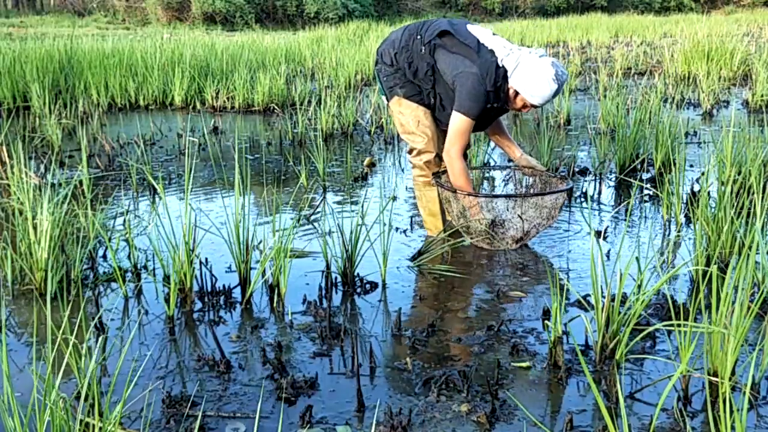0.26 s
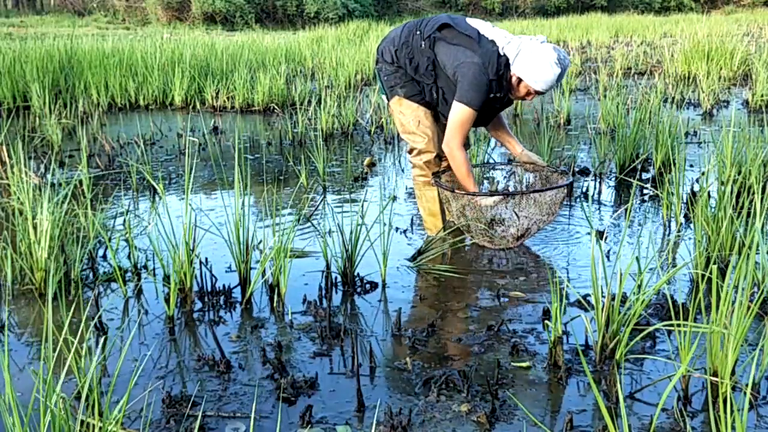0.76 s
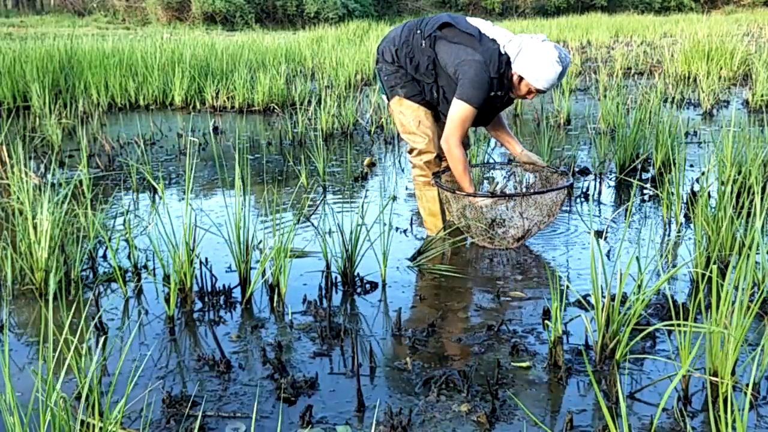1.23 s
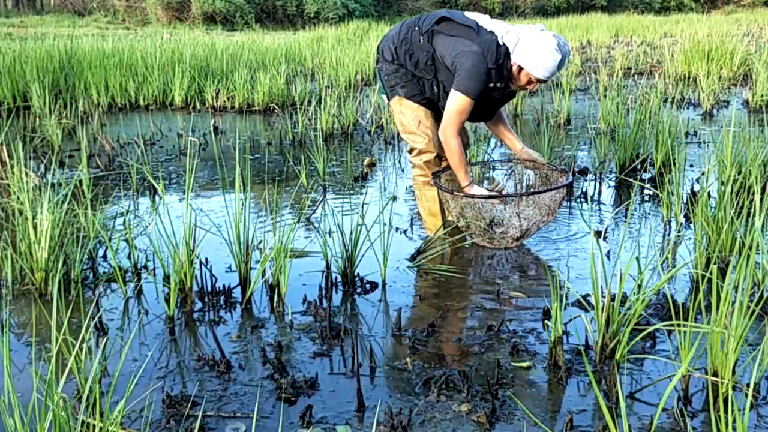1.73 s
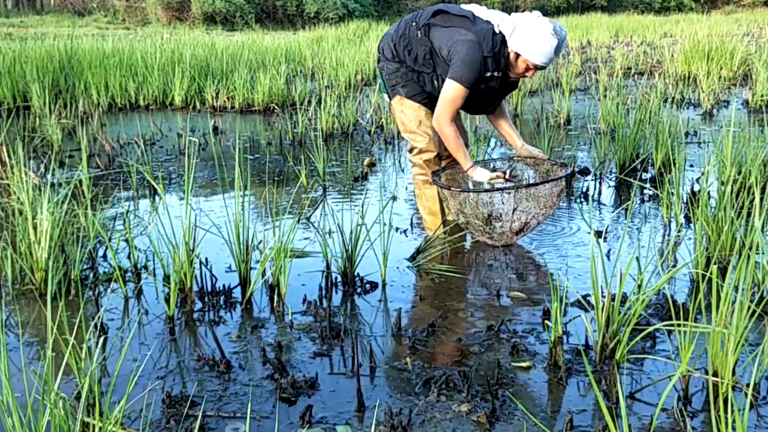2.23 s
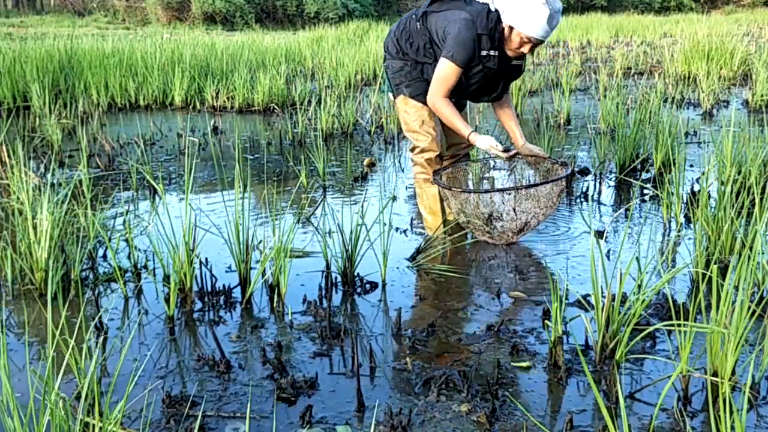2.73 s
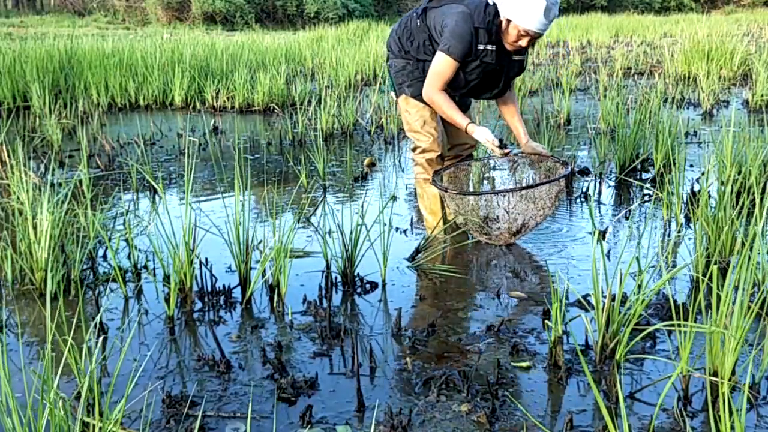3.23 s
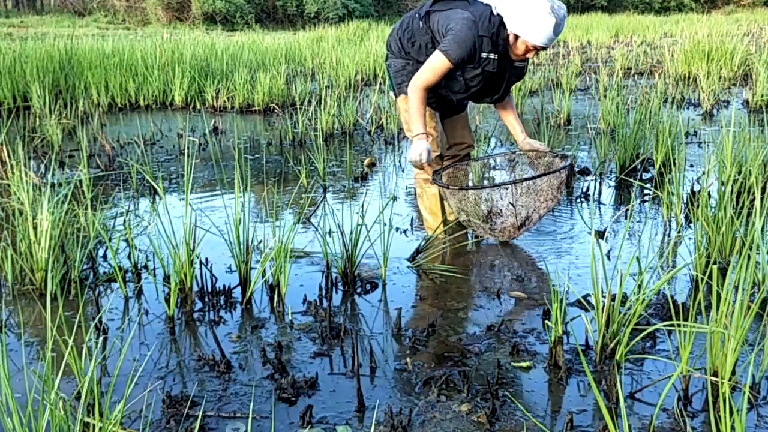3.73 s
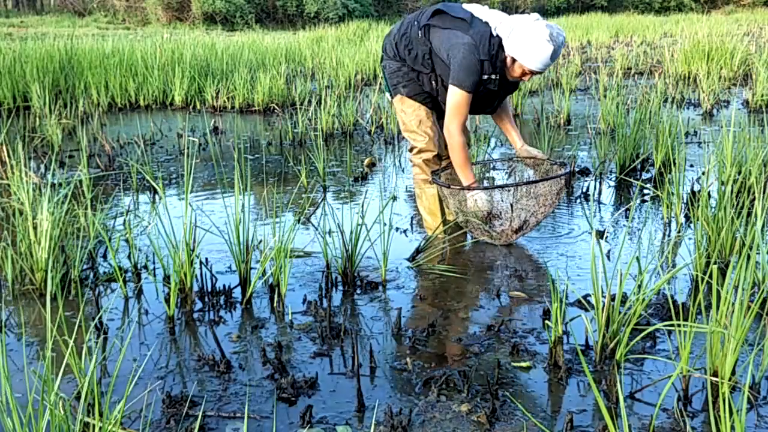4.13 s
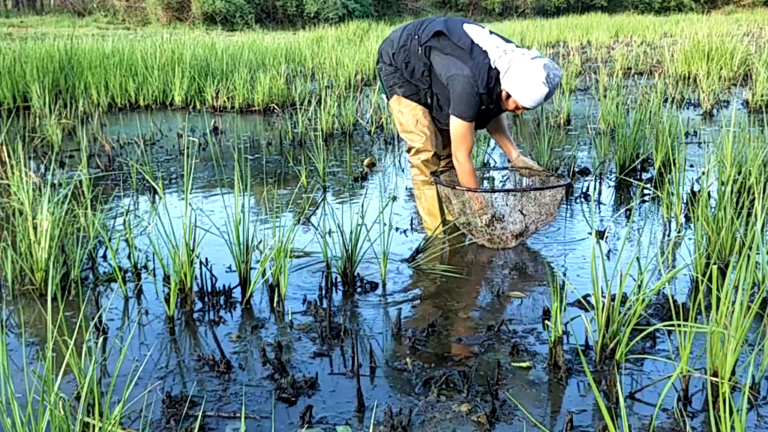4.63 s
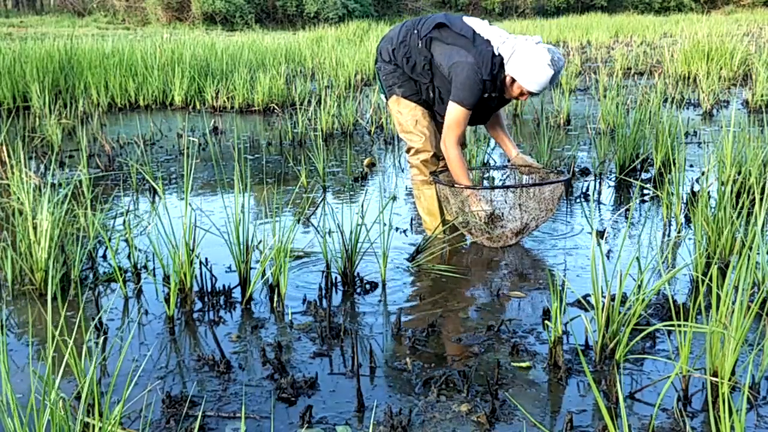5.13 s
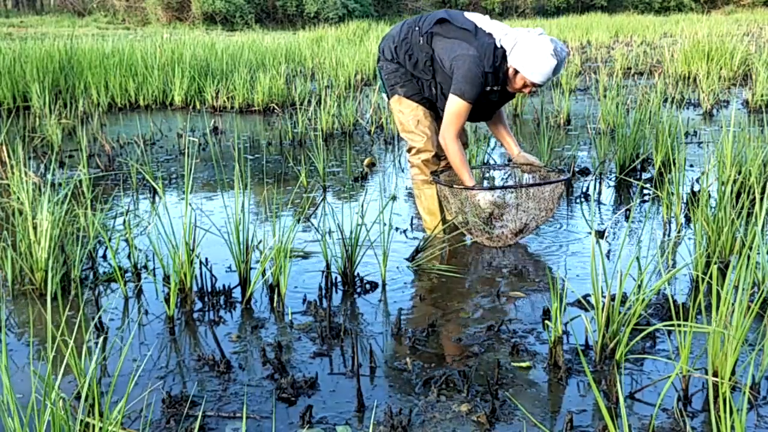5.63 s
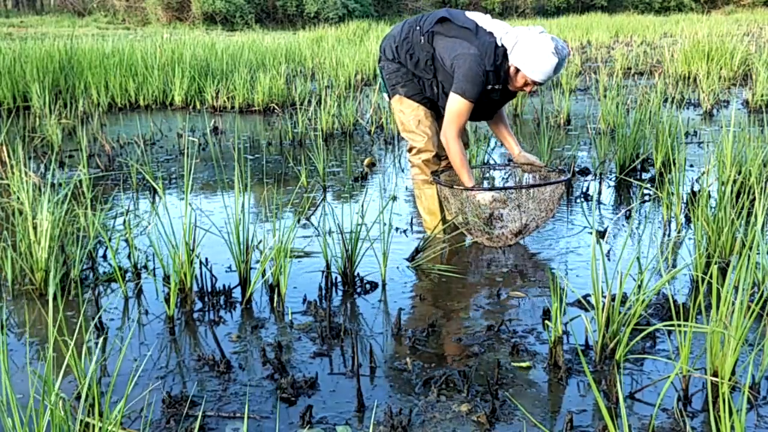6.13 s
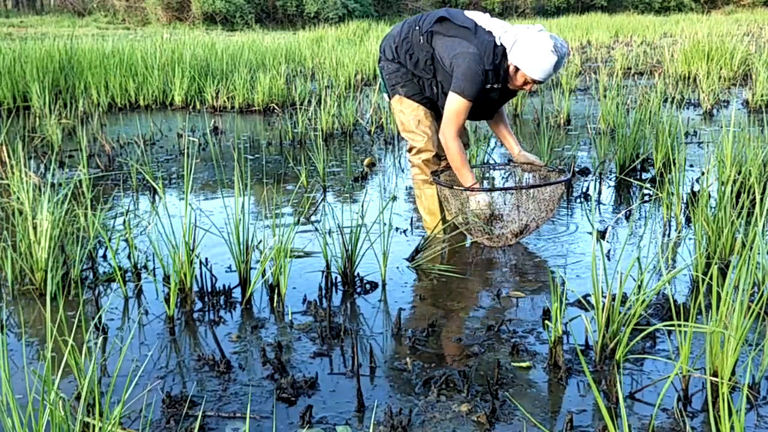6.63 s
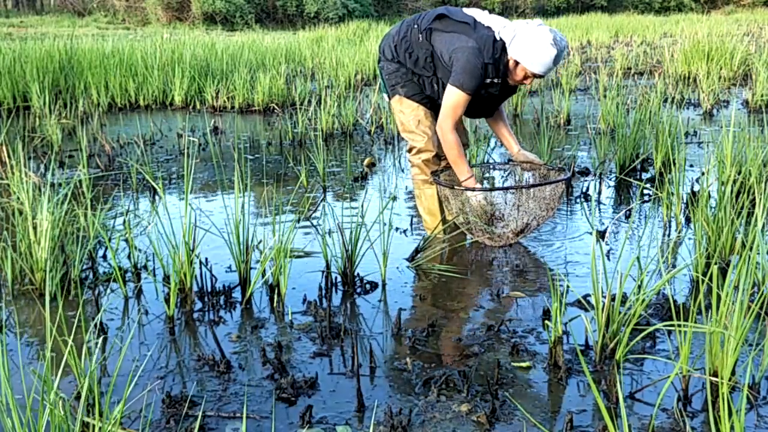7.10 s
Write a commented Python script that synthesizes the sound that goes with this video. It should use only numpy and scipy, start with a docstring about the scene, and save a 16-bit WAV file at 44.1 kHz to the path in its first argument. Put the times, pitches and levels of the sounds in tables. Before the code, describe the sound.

A calm reedy marsh in open air, captured in stereo from the bank, with low far rumble, thin air noise and a faint chorus of frogs and insects. From 0 to 4 seconds, uneven wind gusts buffet the microphone with dull thumps, strongest around 2.9 to 3.6, then the breeze dies away. A near songbird twitters rapidly at 0, 0.6, 1.2, 2.0 and 4.7; dry chips, burred whistles and far high buzzes surround it. Soft coos come early, with wavering rattles near 0.9 and 6.2. A thin insect buzz pulses from 1.7 to 3. Wet weed crackles on a net around 1.9 to 2.1. Small bubbly drops plink throughout; a brighter plop with fine spray lands at 3.8, a smaller one at 4.05. Sparse drips follow. From 6.4 a near bird repeats a tick-and-tweet phrase four times.

```python
"""A quiet reedy marsh: drops slap a shallow pond and ring as trapped bubbles, and wet weed crackles on a net.
Near birds twitter, chip and repeat a phrase; whistles, buzzes, coos and rattles come from further off, all as
gliding tones. An insect's ringing wing strokes pulse over chorus bands, air noise and a low rumble of filtered
noise. A breeze of low turbulence, gusts and eddies buffets two microphone ports, easing after four seconds."""
import sys
import numpy as np
from scipy import signal
from scipy.fft import rfft, irfft
from scipy.io import wavfile
from scipy.ndimage import uniform_filter1d

SR = 44100
rng = np.random.default_rng(int(sys.argv[2]) if len(sys.argv) > 2 else 0)


def master(y):
    """Save y as 16-bit WAV."""
    cut = np.clip(np.atleast_2d(y).T, -1, 1)
    pcm = np.round(cut * 32767)  # scale
    wavfile.write(sys.argv[1], SR, pcm.astype(np.int16))


N = 324576  # length in samples

# far, steady rumble, relative spectrum: freq_hz, density_db_per_hz
RUMBLE_SPECTRUM = [(20, -17), (35, -10), (55, 3), (105, 2.5), (165, -4), (220, -13.5), (300, -20),
                   (420, -34), (700, -63)]
RUMBLE_DB = -54
# open air and reeds, noise spectrum: freq_hz, density_db_per_hz
AIR_SPECTRUM = [(40, -81), (200, -94), (350, -95), (500, -98.5), (1000, -102), (1500, -102), (4200, -104),
                (4900, -118), (6000, -117), (6700, -126), (9000, -127), (12500, -127)]
# distant chorus of frogs and insects, one band a row: centre_hz, width_hz, level_db
CHORUS_BANDS = [(1831, 115, -74), (2415, 362, -66), (3050, 410, -76.5), (3970, 363, -66.5),
                (8820, 400, -101.5)]
# turbulence at the ports, relative spectrum: freq_hz, density_db_per_hz
WIND_SPECTRUM = [(15, -21.5), (30, -8), (55, 0.5), (75, 3), (105, 1.5), (160, -6.5), (210, -17),
                 (280, -29.5), (400, -36.5), (700, -62.5)]
# strength of the breeze between gusts: time_s, level_db
BREEZE_LEVEL = [(0, -45.5), (1.45, -47.5), (2.4, -45.5), (3.7, -50.5), (4.2, -57), (5.1, -58), (5.9, -59),
                (6.4, -66), (7.36, -77)]
# gusts, each on one port: peak_s, length_s, level_db (before a small trim), port (0 left, 1 right)
GUST_SWELLS = [(0.23, 0.12, -33.5, 1), (0.44, 0.12, -45, 0), (0.62, 0.14, -34, 1), (0.794, 0.1, -32.5, 1),
               (0.988, 0.18, -44, 0), (1.164, 0.091, -31.5, 1), (1.8, 0.15, -44.5, 0),
               (1.925, 0.22, -34.5, 1), (2.28, 0.094, -35.5, 1), (2.29, 0.2, -41, 0),
               (2.523, 0.12, -32.5, 1), (2.668, 0.053, -36, 0), (2.682, 0.068, -33.5, 1),
               (2.868, 0.2, -37.5, 1), (2.979, 0.086, -36.5, 0), (3.157, 0.023, -35.5, 1),
               (3.295, 0.067, -33.5, 0), (3.38, 0.11, -33, 1), (3.626, 0.07, -39.5, 0),
               (3.717, 0.066, -42, 1), (3.876, 0.097, -42, 1), (4.87, 0.2, -49, 0), (5.247, 0.099, -46, 0),
               (5.908, 0.27, -49, 0)]
# single eddies that strike one port: peak_s, pitch_hz, level_db, port (0 left, 1 right)
EDDY_THUMPS = [(.457, 92, -23.5, 0), (2.912, 79, -18, 1), (3.189, 96, -21.5, 0), (3.303, 101, -22.5, 0),
               (3.402, 100, -25.5, 1), (3.422, 125, -28.5, 1), (3.537, 85, -24.5, 0),
               (3.610, 106, -20.5, 0), (3.623, 114, -14, 0), (3.721, 123, -28, 1), (3.848, 73, -24.5, 1),
               (4.815, 73, -27, 0), (4.929, 79, -30, 0)]
# a small insect's buzz: time_s, level_db, pulse_depth (0-1)
INSECT_BUZZ = [(0, -91, .2), (1.0, -89, 0.53), (1.7, -80, 0.95), (2.2, -78.5, 0.8), (2.85, -76.5, 1),
               (2.95, -80, 1), (3.05, -104, .2), (5.5, -100, .2), (7.3, -99.5, 0.5)]
# a dove's coos and a marsh bird's hoots: start_s, length_s, start_hz, end_hz, level_db
COO_NOTES = [(0, 0.093, 305, 335, -58.5), (.27, 0.25, 328, 322, -64.5), (.62, 0.42, 327.3, 333.7, -64),
             (1.0, 0.17, 306.3, 327, -60), (1.38, 0.18, 300, 336, -61), (.68, 0.084, 775, 756, -66),
             (6.05, .093, 738, 720, -70), (7.28, 0.098, 835, 840, -67)]
# the marsh bird's falling rattle after a hoot: start_s, length_s, start_hz, end_hz, level_db
RATTLE_NOTES = [(.86, .56, 762, 618, -65), (6.24, .52, 778, 625, -67.5)]
# a far bird's very high buzzes, in threes: start_s, spacing_s
BUZZ_STARTS = [(1.77, .3), (5.17, .345)]
BUZZ_S, BUZZ_HZ, BUZZ_DB = 0.17, 7420, -84  # one buzz
# whistles across the pond: start_s, length_s, start_hz, end_hz, level_db (before the far trim), burr (0-1)
WHISTLE_NOTES = [(.31, .04, 5650, 5100, -74, 0.9), (.342, 0.077, 4800, 3920, -63.5, 0.98),
                 (3.392, 0.048, 5240, 4840, -72, .8), (3.42, 0.053, 4600, 4550, -66, 0.13),
                 (6.39, 0.056, 5670, 4860, -75, 0.9), (6.44, 0.05, 4740, 4620, -69, 0.4),
                 (.825, 0.12, 3140, 2990, -60.5, 0.2), (.912, 0.078, 2970, 2735, -57, 0.1),
                 (1.51, 0.1, 1940, 1920, -60, 0.09), (1.675, 0.06, 3320, 3160, -58.5, 0.5),
                 (1.725, 0.09, 2940, 2670, -61, 0.46), (1.945, 0.072, 3270, 3030, -57.5, 0.7),
                 (2.193, 0.022, 5250, 5300, -64, 0.7), (2.212, 0.059, 5500, 5510, -61, 0.3),
                 (2.405, 0.051, 2730, 2840, -62, 0.4), (2.447, 0.082, 2836, 2910, -55.5, 0.34),
                 (2.93, 0.093, 3120, 3040, -66, 0.04), (3.01, 0.13, 3140, 2983, -60, 0.6),
                 (3.275, 0.11, 3250, 3200, -66, 0.5), (3.02, 0.24, 1937, 1947, -59.5, 0.6),
                 (3.85, 0.124, 2060, 1853, -60, .2), (4.03, 0.12, 2530, 2560, -61, 0.27),
                 (4.29, 0.1, 2920, 2740, -61, 0.02), (4.622, 0.045, 3020, 2820, -60, 0.35),
                 (4.66, 0.079, 2820, 2880, -56, 0.3), (4.757, 0.07, 2570, 2503, -59.5, 0.16),
                 (5.535, 0.15, 3070, 3140, -60.5, 0.48), (5.665, 0.053, 1930, 1900, -61, 0.05),
                 (5.718, 0.032, 1910, 1860, -56.5, .15), (5.745, 0.077, 3420, 3380, -61.5, 0.18),
                 (5.822, 0.091, 3046, 3025, -59, 0.26)]
# dry chips from the reeds, single or in quick series: start_s, chip_count, pitch_hz, level_db
CHIP_SERIES = [(.472, 1, 3720, -52.5), (.577, 1, 3700, -56), (1.901, 1, 3600, -51.5), (4.584, 1, 3630, -55),
               (5.035, 1, 3750, -52.5), (6.238, 3, 4010, -54), (6.528, 1, 4100, -57),
               (6.567, 3, 3960, -53.5), (7.159, 1, 4240, -56)]
CHIP_S, CHIP_SPACING_S = .008, .0205
CHIP_FALL, CHIP_FADE_DB = 0.28, 1  # fall as a share of the pitch; loss per chip in a series
# a near bird's repeated phrase: start_s, level_db, tweet_rise_hz
PHRASE_REPEATS = [(6.431, -51.5, 260), (6.697, -50, 240), (6.939, -51, 220), (7.190, -51, 20)]
# tick and flick that open the phrase: delay_s, length_s, start_hz, end_hz, relative_level_db, burr (0-1)
OPENING_NOTES = [(0, 0.013, 4326, 3960, 0.2, 0.33), (0.021, 0.0126, 3850, 2770, -3.5, 0.84)]
TWEET_DELAY_S, TWEET_S, TWEET_HZ, TWEET_DB = 0.049, 0.041, 3760, 0.7  # closing tweet; dB over the phrase
# a near songbird's runs of slurs: start_s, length_s, centre_hz, sweep_hz, level_db
TWITTER_SLURS = [(.006, 0.016, 3370, 748, -50.5), (0.036, 0.016, 3310, 800, -48.5),
                 (.066, 0.017, 3400, 900, -46.5), (0.095, 0.015, 3220, 448, -51.5),
                 (0.124, 0.026, 3385, 452, -45.5), (0.61, .014, 3280, 500, -51.5),
                 (0.642, .016, 3250, 398, -50.5), (0.674, 0.017, 3280, 698, -49.5),
                 (0.704, .016, 3340, 699, -49), (.734, 0.019, 3350, 649, -46.5),
                 (0.765, 0.023, 3285, 220, -48.5), (0.801, .014, 3290, 280, -49),
                 (0.829, 0.024, 3450, 347, -49), (1.238, 0.022, 3280, 604, -52),
                 (1.265, 0.028, 3215, 700, -51.5), (1.302, 0.017, 3260, 650, -51.5),
                 (1.33, 0.015, 3280, 500, -52.5), (1.361, 0.017, 3280, 600, -53),
                 (1.393, 0.018, 3220, 600, -54.5), (1.426, 0.019, 3460, 650, -49),
                 (1.445, 0.025, 3360, 546, -46.5), (1.468, 0.036, 3510, 243, -49),
                 (1.499, 0.016, 3390, -250, -48), (2.021, 0.017, 3230, 750, -51),
                 (2.057, 0.015, 3310, 850, -50.5), (2.088, 0.022, 3290, 498, -48.5),
                 (2.121, 0.019, 3340, 900, -50.5), (2.156, .016, 3620, 850, -47.5),
                 (2.193, 0.025, 3420, 550, -48), (2.235, 0.019, 3300, 99, -48.5),
                 (4.694, .013, 3350, 456, -55), (4.72, 0.012, 3280, 600, -52),
                 (4.751, 0.012, 3270, 500, -49), (4.778, 0.018, 3270, 450, -48),
                 (4.812, 0.014, 3250, 550, -47), (4.841, 0.018, 3240, 652, -47),
                 (4.874, 0.016, 3210, 750, -49), (4.906, 0.015, 3370, 500, -49),
                 (4.938, 0.011, 3360, 402, -54.5), (4.961, .017, 3420, 250, -48.5),
                 (4.974, 0.022, 3350, -320, -50.5)]
# wet weed dragged over the mesh in rubs and scratches: peak_s, length_s, centre_hz, level_db
WEED_RUBS = [(.05, .38, 5400, -86), (.7, 0.53, 5320, -81), (1.364, .012, 4800, -75),
             (1.406, 0.0089, 4500, -70), (1.869, .012, 4670, -68), (1.932, 0.0097, 4570, -60.5),
             (1.927, 0.017, 6100, -71), (2.005, .012, 4700, -66), (2.026, .012, 6500, -71),
             (2.04, 0.24, 5830, -78.5), (2.078, .012, 5450, -66), (2.452, 0.93, 5370, -85),
             (3.3, 0.2, 5360, -84), (3.827, 0.072, 5500, -75), (6.24, 0.29, 5370, -83)]
# drops that trap a bubble, levels before the water filter:
# start_s, pitch_hz, ring_level_db, decay_s, impact_over_ring_db
WATER_DROPS = [(.704, 1760, -52.5, 0.007, -4), (0.713, 2300, -50, .0024, 4), (.734, 1200, -46, 0.0014, 7),
               (1.340, 2030, -50, 0.0062, -5), (1.3602, 3850, -43, 0.0021, -12),
               (1.413, 2770, -45, 0.0018, 1), (1.651, 1690, -48, 0.0041, -6),
               (1.8629, 1865, -48.5, 0.0083, -1), (2.016, 1507, -47, 0.0089, 1),
               (2.976, 1092, -48.5, 0.012, -1), (3.479, 1780, -45, 0.0039, -10),
               (3.767, 2280, -45.5, 0.00079, 7), (3.7893, 1244, -37.5, 0.0055, 14.5),
               (3.798, 1190, -54, 0.01, -12), (3.797, 3850, -48, 0.0017, -6),
               (3.801, 2580, -40.5, 0.0025, -4), (3.809, 2900, -49, .0018, -6),
               (3.816, 3080, -51, .002, -8), (3.8205, 2150, -52, 0.0027, -8), (3.8265, 2750, -49, .003, -6),
               (3.8263, 1440, -39, 0.0018, -5), (3.836, 1240, -46, 0.0038, 3),
               (3.8445, 1960, -45, .002, -2), (3.857, 2080, -59, 0.0045, -8),
               (3.874, 1740, -50, 0.0046, -12), (3.889, 1960, -54, .005, -10),
               (3.964, 2470, -49.5, 0.0047, -8), (4.011, 1250, -55.5, .008, -8),
               (4.045, 1510, -37.5, 0.0021, 1), (4.0473, 2500, -49, 0.003, -8),
               (4.051, 1330, -48.5, 0.0065, -12), (4.062, 1260, -57, 0.0069, -10),
               (4.063, 2000, -53, .002, 0), (4.0815, 1186, -46.5, 0.0054, 6), (4.441, 840, -46, .0016, -5),
               (4.912, 1280, -52.5, 0.0063, 1), (5.594, 4000, -45.5, .0029, -9),
               (5.682, 1570, -53, 0.0074, -6), (5.711, 1457, -50.5, 0.013, -7),
               (5.855, 2380, -46, 0.0027, -1), (6.063, 1570, -50, 0.0054, 2),
               (6.549, 1755, -50.5, 0.0053, -4), (6.662, 2120, -49, 0.0043, -8),
               (7.067, 1080, -47.5, 0.0013, -8)]
# fine spray from bigger plops, level before the water filter: start_s, length_s, loudest_droplet_db
SPRAY_BURSTS = [(3.789, .014, -45), (3.805, 0.055, -43.5), (4.043, 0.046, -49)]
# bursting water films, level before colouring: start_s, level_db, decay_s
FILM_CRACKS = [(3.767, -62, .002), (3.772, -56, .002), (3.7954, -51, .0015), (3.799, -45, .002),
               (3.803, -45, .0018), (3.844, -56, 0.0065), (.734, -55, .001), (1.652, -64, .001)]
# brightness of those cracks: freq_hz, gain_db
CRACK_COLOUR = [(800, -18), (2500, -16), (4500, 4.0), (7500, -6.5), (10000, -18), (13000, -5)]
TOP_HZ = 12750  # edge of the recorder's top cut


def undb(db):
    """Decibels to gain."""
    return 10 ** (np.asarray(db) / 20)


def curve(rows, axis=1):
    """One column of a table, joined by straight lines in time."""
    rows = np.array(rows)
    return np.interp(np.arange(N) / SR, rows[:, 0], rows[:, axis])


def unit(x):
    """Scale to rms 1."""
    return x / np.sqrt(np.mean(x ** 2))


def walk(rate, size=N):
    """Slow chance with a spread near 1: random knots, rate per second, joined by lines."""
    knots = np.arange(size) / SR * rate
    count = int(knots[-1]) + 2
    return 1.2 * np.interp(knots, np.arange(count), rng.standard_normal(count))


def bins():
    """Frequencies of the spectrum of a whole track."""
    return np.fft.rfftfreq(N, 1 / SR)


def colour(points):
    """Gain at every frequency from (Hz, dB) points."""
    hz, db = np.transpose(points)
    return undb(np.interp(np.log(bins() + 1), np.log(hz), db))


def noise_pair(gain, likeness):
    """Coloured noise at two ports that have a share of it in common."""
    left, right, common = rng.standard_normal((3, N))
    share = np.clip(likeness, 0, 1)
    mixed = np.sqrt(1 - share) * np.array([left, right]) + np.sqrt(share) * common
    return irfft(rfft(mixed) * gain, N)


def band(x, low_hz, high_hz, order=2):
    """Band-pass filter."""
    edges = [low_hz, min(high_hz, SR / 2 - 1)]
    return signal.sosfilt(signal.butter(order, edges, "band", fs=SR, output="sos"), x)


def add(track, s, sound):
    """Mix a short sound into a track at time s."""
    i = int(np.clip(s * SR, 0, N - 1))
    track[i:i + len(sound)] += sound[:N - i]


def swell_at(s, length, db):
    """A bell-shaped rise and fall of gain, about length seconds wide."""
    return undb(db) * np.exp(-2 * ((np.arange(N) / SR - s) / length) ** 2)


def place(x, lead_ms, pan_db, wet_db, t60):
    """Direct sound reaches one port first (left if positive); reeds and bank scatter a thin tail."""
    sides = np.array([[.5], [-.5]])
    lead = np.exp(2j * np.pi * bins() * sides * lead_ms / 1000)
    direct = irfft(rfft(x) * lead, N) * undb(sides * pan_db)
    t = np.arange(SR) / SR
    tail = rng.standard_normal((2, SR)) * np.exp(-np.log(1000) * t / t60)
    tail /= np.sqrt(np.sum(tail ** 2, axis=1, keepdims=True))
    return direct + undb(wet_db) * signal.fftconvolve(x[None], tail, axes=1)[:, :N]


def song(notes, burr_hz=260, burr_rate=125, rasp=0.65, waver=0.0036, fullness=1):
    """Each note is a gliding tone that swells and fades; a burr is a fast, slightly uneven vibrato."""
    out = np.zeros(N)
    for s, length, start_hz, end_hz, db, *burr in notes:
        size = max(int(length * SR), 16)
        vibrato = np.sin(2 * np.pi * burr_rate * np.arange(size) / SR) + rasp * walk(500, size)
        glide = np.linspace(start_hz, end_hz, size) * (1 + waver * walk(90, size))
        hz = glide + sum(burr) * burr_hz * vibrato  # a note without a burr column stays clean
        swell = np.abs(np.sin(np.linspace(0, np.pi, size))) ** fullness
        add(out, s, undb(db) * swell * np.sin(2 * np.pi * np.cumsum(hz) / SR))
    return out


def rumble(swell_db=0.35):
    """Deep sound from far away reaches both ports nearly alike."""
    noise = unit(noise_pair(colour(RUMBLE_SPECTRUM), likeness=0.97))
    return noise * undb(RUMBLE_DB + swell_db * walk(2.0))


def marsh(flicker_db=1.13, swell_db=1.36):
    """Smooth air noise under the bands of a far chorus that swell and flicker."""
    out = noise_pair(colour(AIR_SPECTRUM) * np.sqrt(SR / 2), likeness=0.1)
    for hz, width_hz, db in CHORUS_BANDS:
        bell = np.exp(-((bins() - hz) / width_hz) ** 2 / 2)
        voices = unit(noise_pair(bell, likeness=0.027))
        out = out + voices * undb(db + swell_db * walk(1.676) + flicker_db * walk(30))
    return out


def breeze(gust_db=0.03, flutter_db=2.5, eddy_cycles=0.2):
    """Each port has mostly its own turbulence, swelling in gusts; now and then an eddy thumps one port."""
    power = np.array([undb(curve(BREEZE_LEVEL))] * 2) ** 2
    for s, length, db, port in GUST_SWELLS:
        power[int(round(port))] += swell_at(s, length, db + gust_db) ** 2
    flutter = flutter_db * np.array([walk(35), walk(35)])
    out = unit(noise_pair(colour(WIND_SPECTRUM), likeness=0.065)) * np.sqrt(power) * undb(flutter)
    t = np.arange(-SR // 20, SR // 20) / SR
    for s, hz, db, port in EDDY_THUMPS:
        thump = np.cos(2 * np.pi * hz * t) / np.cosh(t * hz / eddy_cycles)
        add(out[int(round(port))], s + t[0], undb(db) * thump)
    return signal.sosfilt(signal.butter(2, 620, fs=SR, output="sos"), out)  # low-pass, Hz


def insect(pulse_hz=8.2, first_s=0.135, swell=1.6, stroke_hz=125, ring_hz=8750, stroke_fall=0.061,
           waver=0.013, sharpness=1.4):
    """Each wing stroke rings one high, falling tone; strokes come in pulses that build up and stop short."""
    t = np.arange(N) / SR
    depth = np.clip(curve(INSECT_BUZZ, axis=2), 0, 1)
    ramps = (((t - first_s) * pulse_hz) % 1) ** swell
    pulses = 1 - depth + depth * uniform_filter1d(ramps, size=500)
    phase = np.cumsum(stroke_hz * (1 + .012 * walk(20))) / SR % 1
    hz = ring_hz * (1 + stroke_fall * (.5 - phase) + waver * walk(500))
    beat = np.sin(np.pi * phase) ** (2 * sharpness)
    strokes = unit(beat * np.sin(2 * np.pi * np.cumsum(hz) / SR))
    level = undb(curve(INSECT_BUZZ) + 1.2 * walk(60))
    return place(strokes * pulses * level, lead_ms=-0.031, pan_db=-1.5, wet_db=-5.5, t60=0.15)


def low_calls(rattle_hz=38):
    """Coos and hoots are low wavering tones; a fast throb in level chops the falling rattles."""
    throb = (.5 + .5 * np.cos(2 * np.pi * np.cumsum(rattle_hz + 2 * walk(12)) / SR)) ** 2
    coos = song(COO_NOTES, waver=.02, fullness=.7)
    rattles = throb * song(RATTLE_NOTES, waver=0.0404, fullness=0.21)
    return place(coos + rattles, lead_ms=.34, pan_db=-.8, wet_db=-8, t60=.6)


def buzzes():
    """Three level, fully burred notes at an even pace, behind a strong tail."""
    notes = [(s + k * spacing, BUZZ_S, BUZZ_HZ, BUZZ_HZ, BUZZ_DB, 1)
             for s, spacing in BUZZ_STARTS for k in range(3)]
    calls = song(notes, burr_hz=290, burr_rate=100, rasp=0.38, fullness=0.56)
    return place(calls, lead_ms=0.025, pan_db=-2.0, wet_db=1, t60=0.43)


def faint_notes(db=-70, centre_hz=2900, spread_octaves=0.45, glide=0.066, length_s=0.11, count=8):
    """Faint birds call at random times and pitches, each note falling slightly."""
    notes = []
    for when, pitch, burr in rng.random((count, 3)):
        hz = centre_hz * 2 ** (spread_octaves * (pitch - .5))
        notes.append((when * N / SR, length_s, hz, hz * (1 - glide), db, burr / 2))
    return notes


def whistles(far_db=-1.5, flutter_db=2.0):
    """Far whistles and faint calls hold full through each note; moving air makes them flutter in level."""
    calls = song(WHISTLE_NOTES + faint_notes(), burr_hz=193.0, fullness=0.26)
    far = calls * undb(far_db + flutter_db * walk(70))
    return place(far, lead_ms=.04, pan_db=1.5, wet_db=-7.5, t60=.7)


def chips():
    """Every chip is a quick fall in pitch; a series fades as it goes."""
    top, bottom = 1 + CHIP_FALL / 2, 1 - CHIP_FALL / 2
    notes = [(s + k * CHIP_SPACING_S, CHIP_S, hz * top, hz * bottom, db - k * CHIP_FADE_DB)
             for s, count, hz, db in CHIP_SERIES for k in range(int(round(count)))]
    return place(song(notes), lead_ms=0.063, pan_db=2.5, wet_db=-2.0, t60=0.3)


def phrases():
    """Tick and flick keep their pitches at every repeat; the closing tweet rises less each time."""
    notes = []
    for s, db, rise_hz in PHRASE_REPEATS:
        for delay, length, start_hz, end_hz, note_db, burr in OPENING_NOTES:
            notes.append((s + delay, length, start_hz, end_hz, db + note_db, burr))
        low_hz, high_hz = TWEET_HZ - rise_hz / 2, TWEET_HZ + rise_hz / 2
        notes.append((s + TWEET_DELAY_S, TWEET_S, low_hz, high_hz, db + TWEET_DB, .08))
    return place(song(notes), lead_ms=0.039, pan_db=-0.5, wet_db=-9.5, t60=0.27)


def twitter(burr=.08):
    """Every slur sweeps through its centre pitch with a slight burr."""
    notes = [(s, length, hz - sweep / 2, hz + sweep / 2, db, burr)
             for s, length, hz, sweep, db in TWITTER_SLURS]
    return place(song(notes, waver=0.0052), lead_ms=0.077, pan_db=1.5, wet_db=-9, t60=0.45)


def rustle(grains_per_s=1100, spread_db=4, width=0.16):
    """Tiny crackles of wet weed dragged over the mesh; each rub swells in a band of its own."""
    grains = (rng.random(N) < grains_per_s / SR) * rng.choice([-1, 1], N)
    crackle = grains * undb(spread_db * np.minimum(rng.exponential(size=N), 4))
    rubs = np.zeros(N)
    for s, length, hz, db in WEED_RUBS:
        scratch = unit(band(crackle, hz / (1 + width), hz * (1 + width), order=3))
        rubs += scratch * swell_at(s, length, db)
    return place(rubs, lead_ms=-0.055, pan_db=5.5, wet_db=-2.5, t60=0.24)


def bubble(hz, decay, rise, sink=0, sink_s=0.0041):
    """A trapped bubble rings; pitch drops as it is driven under, then climbs ever faster near the surface."""
    t = np.arange(int(6 * decay * SR) + 2) / SR
    pitch = hz * (1 + sink * np.exp(-t / sink_s) + rise * (t / decay) ** 2)
    return np.exp(-t / decay) * np.sin(2 * np.pi * np.cumsum(pitch) / SR)


def spray(track, range_db=12, cycles=1.5, count=80):
    """Each burst of droplets patters back as tiny bubbles of random time, pitch and size."""
    for s, length, db in SPRAY_BURSTS:
        for when, pitch, size in rng.random((count, 3)):
            hz = 1900 * 2.5 ** pitch
            # late and high-pitched droplets are softer
            level = undb(db - range_db * size - 6.9 * when) * (2500 / max(hz, 2500))
            add(track, s + when * length, level * bubble(hz, cycles / hz, rise=0.019))


def film_cracks():
    """Bursting water films are short decaying bursts of bright noise."""
    cracks = np.zeros(N)
    t = np.arange(SR // 20) / SR
    for s, db, decay in FILM_CRACKS:
        add(cracks, s, undb(db) * np.exp(-t / decay) * rng.standard_normal(len(t)))
    return irfft(rfft(cracks) * colour(CRACK_COLOUR), N)


def dripping(impact_s=0.000083, slap_hz=2500):
    """Drops slap the pond and ring as bubbles, joined by spray and cracking films."""
    water = np.zeros(N)
    for s, hz, db, decay, impact_db in WATER_DROPS:
        add(water, s, undb(db) * bubble(hz, decay, rise=0.02, sink=0.068))
        # a slap dies within a cycle or two
        add(water, s, undb(db + impact_db) * bubble(slap_hz, impact_s, rise=0))
    spray(water)
    water = band(water, 1050, 4600, order=4)
    return place(water + film_cracks(), lead_ms=0.033, pan_db=1.5, wet_db=-13.0, t60=0.16)


def scene():
    """Everything heard from the bank, background first."""
    background = rumble() + marsh() + breeze() + insect()
    far_birds = low_calls() + buzzes() + whistles()
    near_birds = chips() + phrases() + twitter()
    return background + far_birds + near_birds + rustle() + dripping()


def record(dry):
    """The recorder cuts the top with a steep low-pass."""
    return signal.sosfilt(signal.ellip(8, .2, 70, TOP_HZ, fs=SR, output="sos"), dry)


dry = scene()
out = record(dry)
master(out)
```